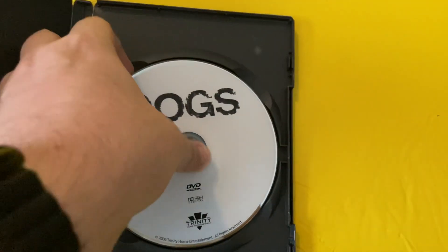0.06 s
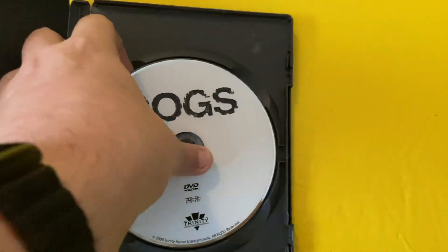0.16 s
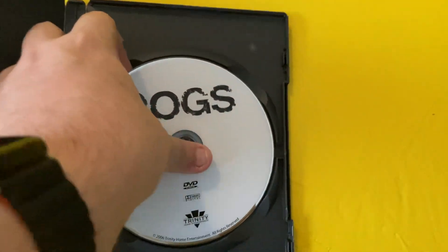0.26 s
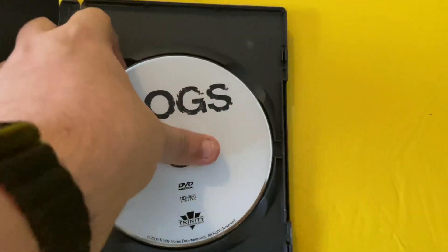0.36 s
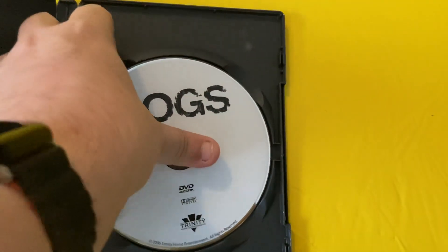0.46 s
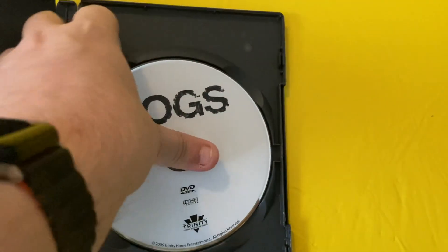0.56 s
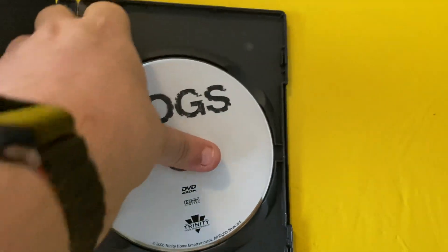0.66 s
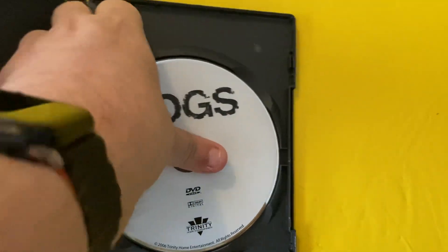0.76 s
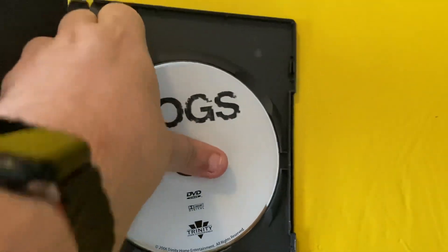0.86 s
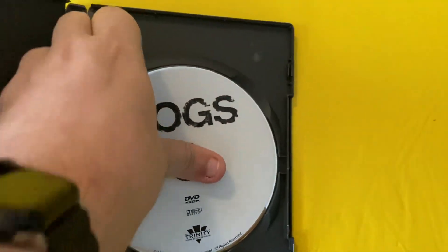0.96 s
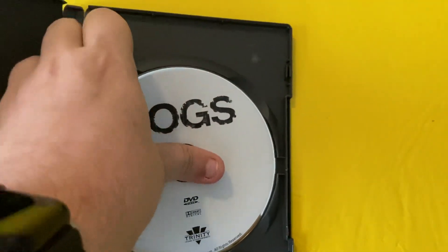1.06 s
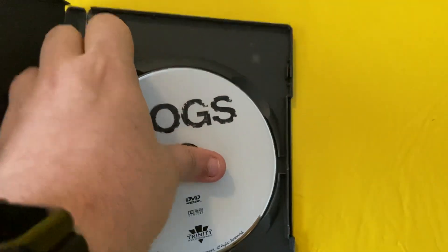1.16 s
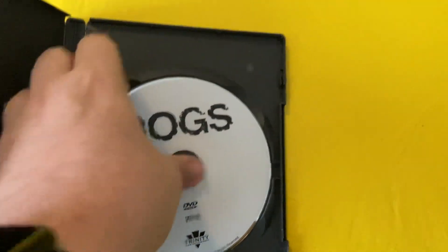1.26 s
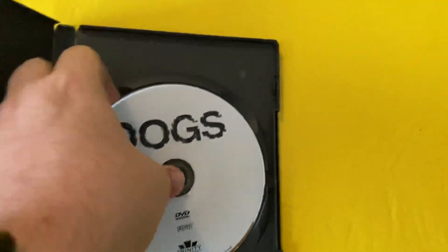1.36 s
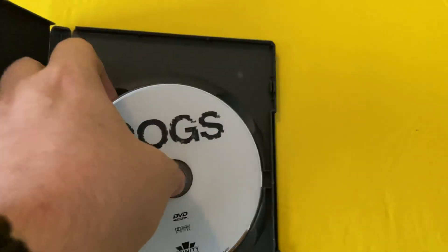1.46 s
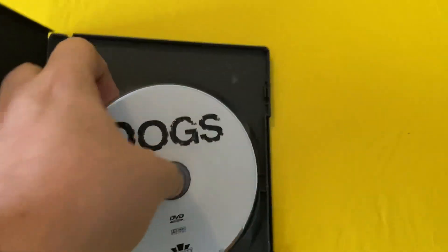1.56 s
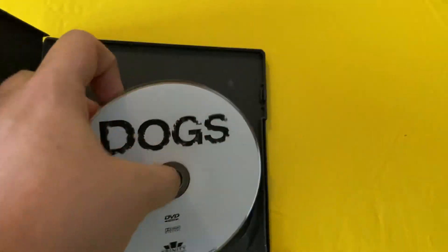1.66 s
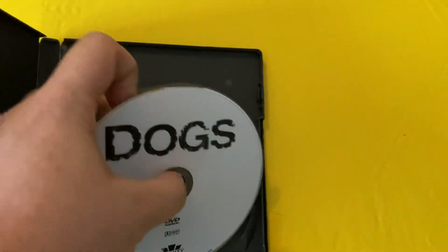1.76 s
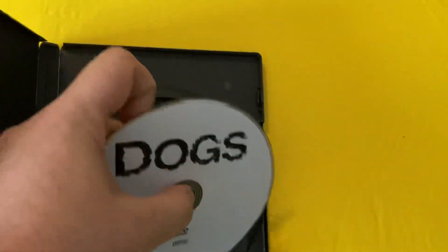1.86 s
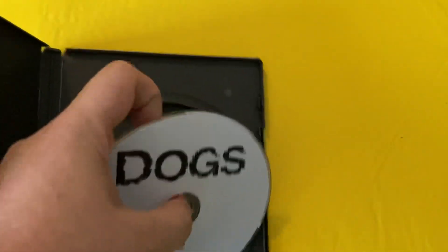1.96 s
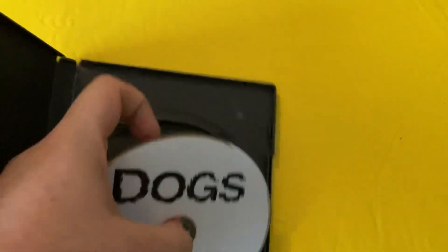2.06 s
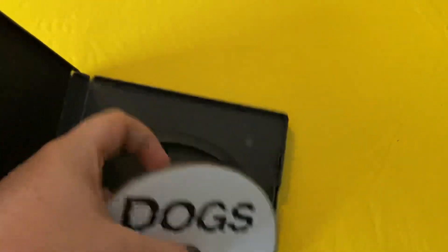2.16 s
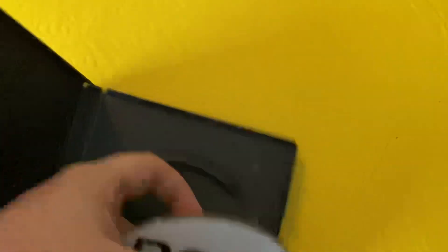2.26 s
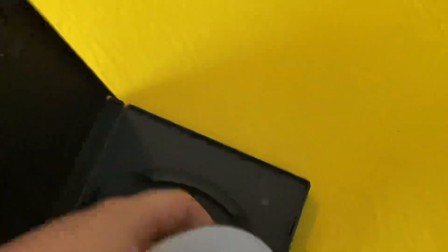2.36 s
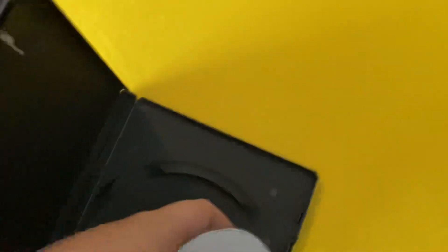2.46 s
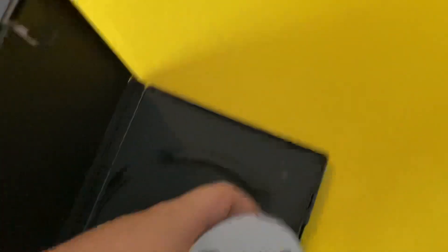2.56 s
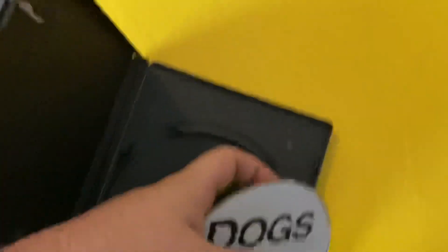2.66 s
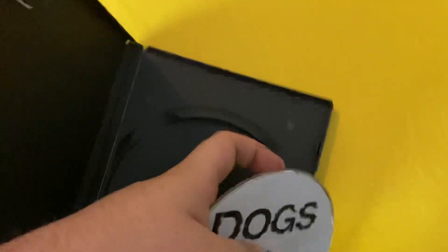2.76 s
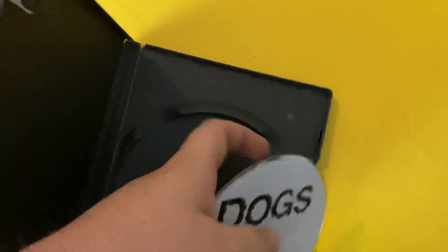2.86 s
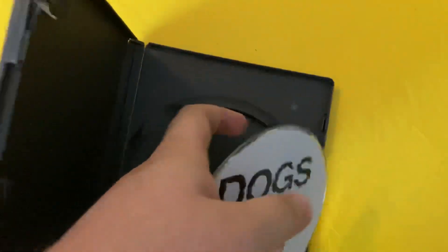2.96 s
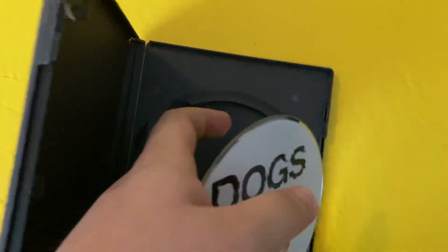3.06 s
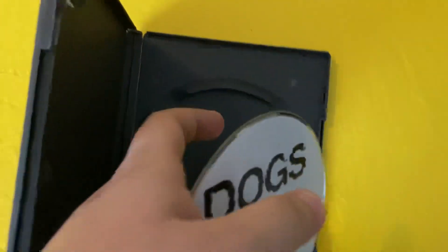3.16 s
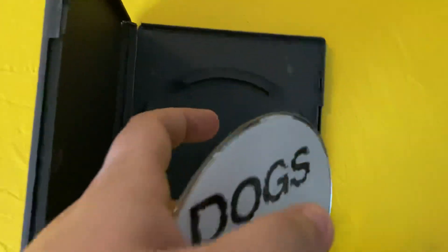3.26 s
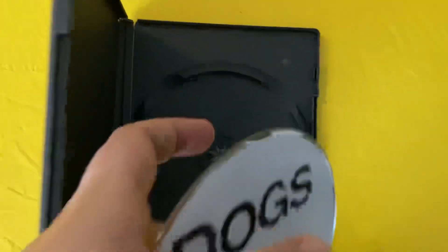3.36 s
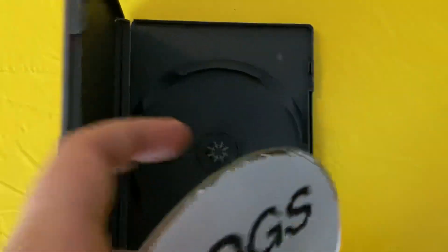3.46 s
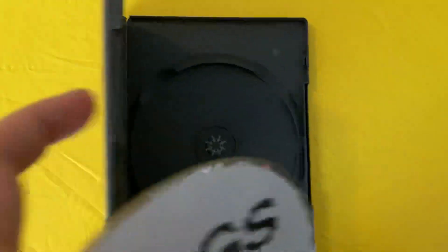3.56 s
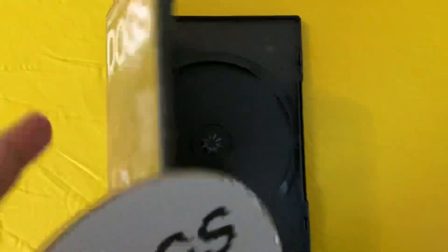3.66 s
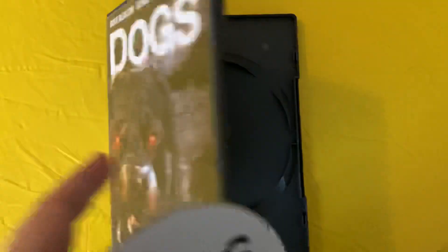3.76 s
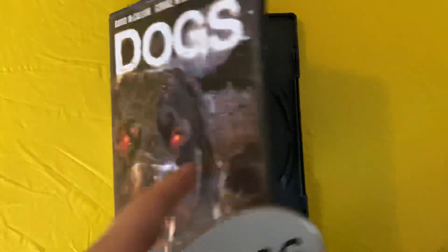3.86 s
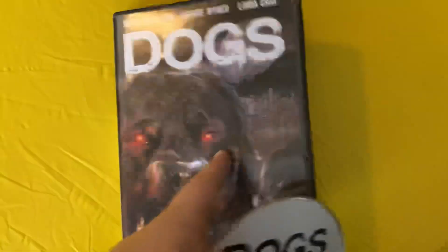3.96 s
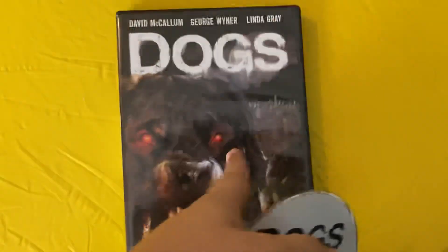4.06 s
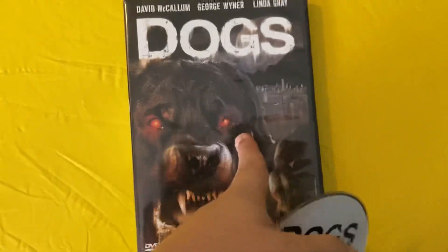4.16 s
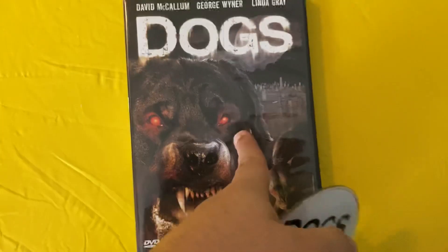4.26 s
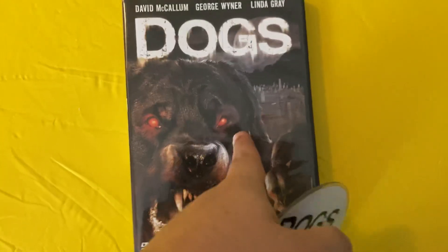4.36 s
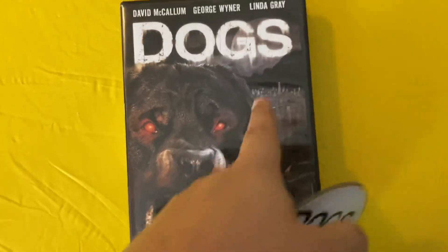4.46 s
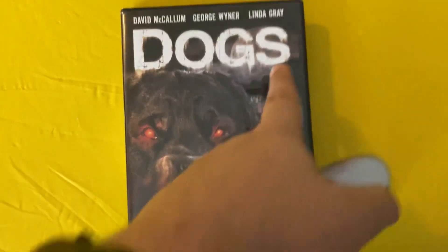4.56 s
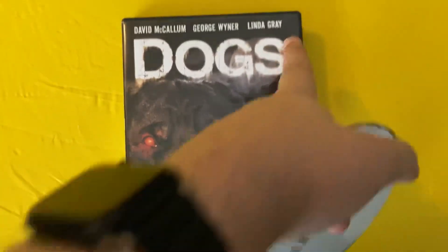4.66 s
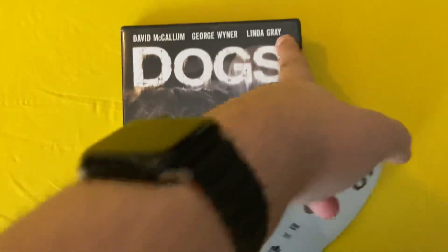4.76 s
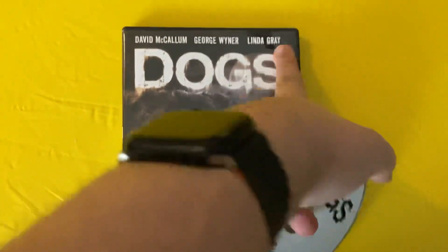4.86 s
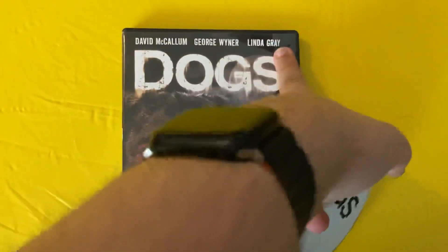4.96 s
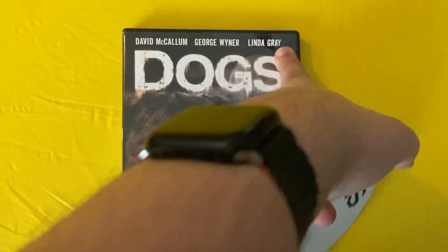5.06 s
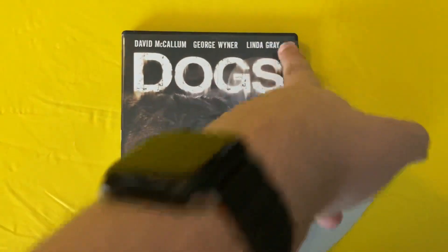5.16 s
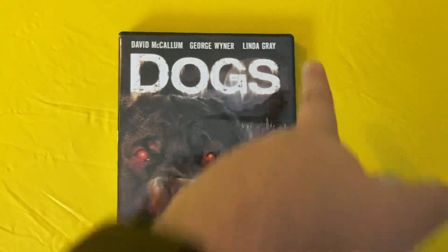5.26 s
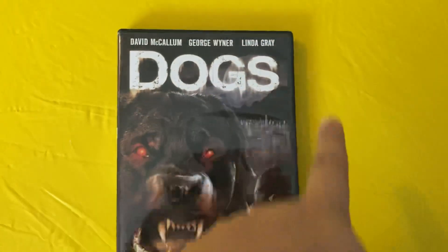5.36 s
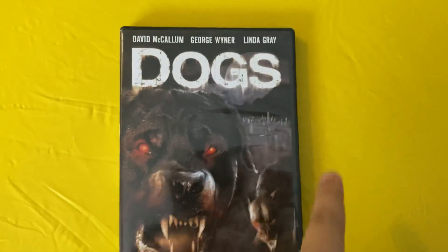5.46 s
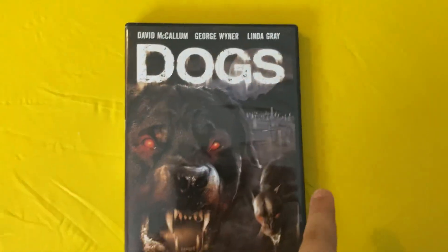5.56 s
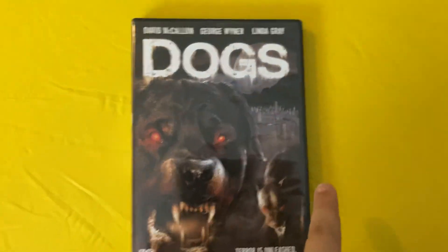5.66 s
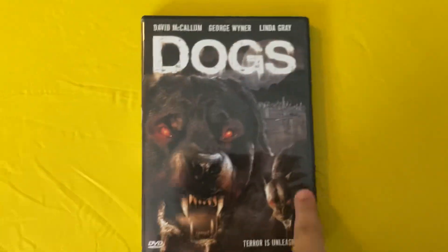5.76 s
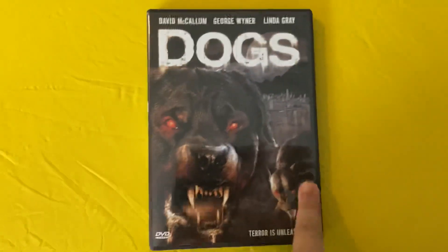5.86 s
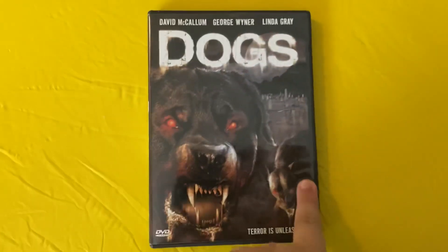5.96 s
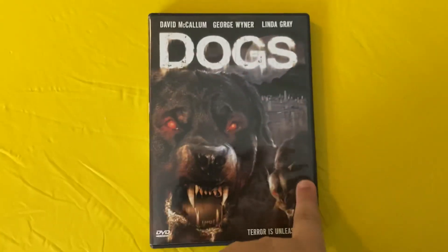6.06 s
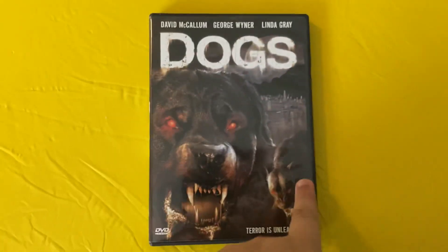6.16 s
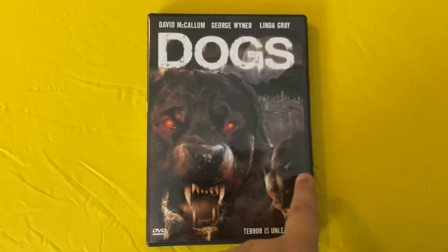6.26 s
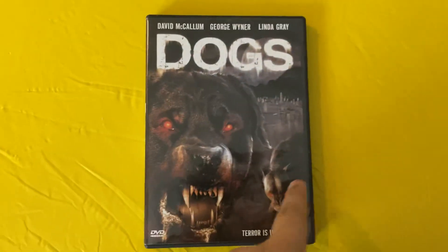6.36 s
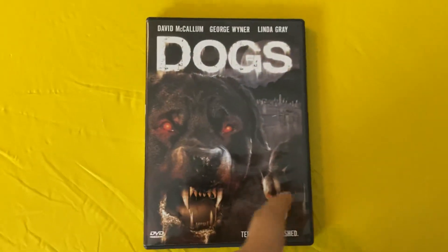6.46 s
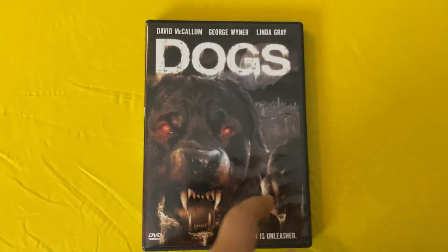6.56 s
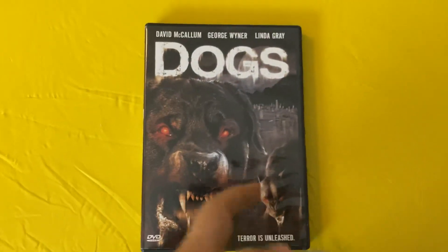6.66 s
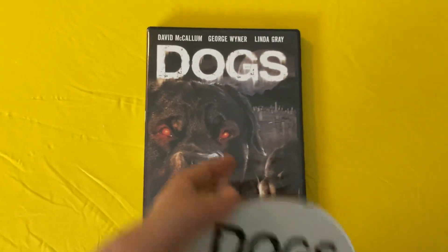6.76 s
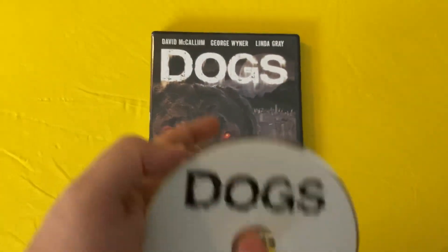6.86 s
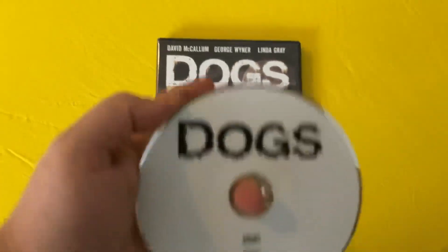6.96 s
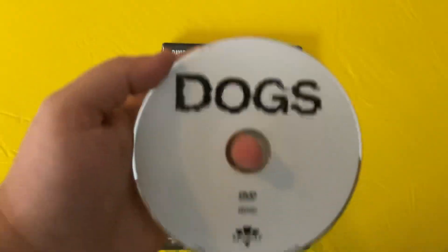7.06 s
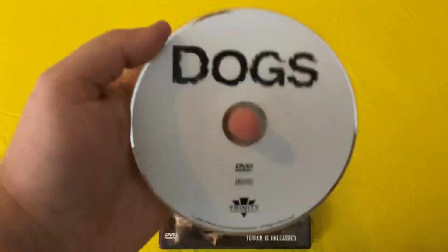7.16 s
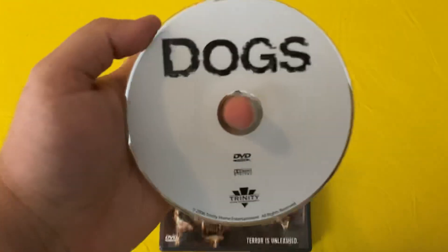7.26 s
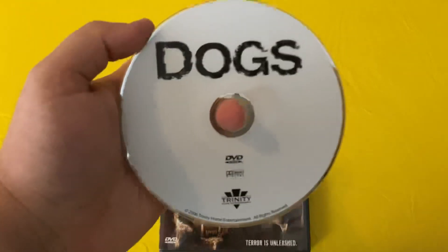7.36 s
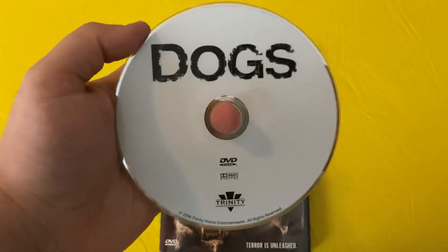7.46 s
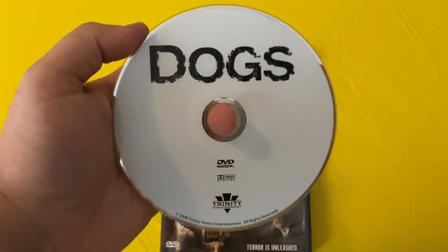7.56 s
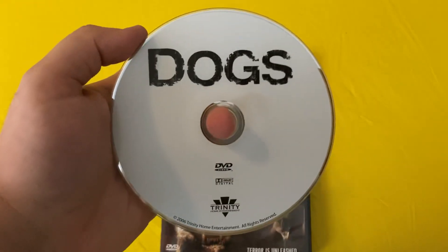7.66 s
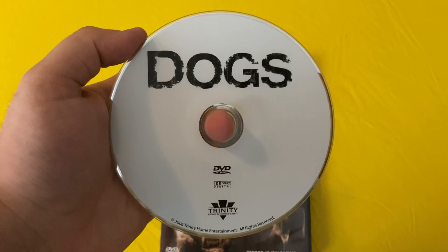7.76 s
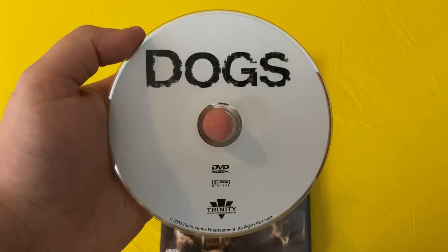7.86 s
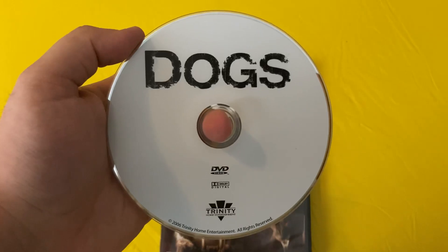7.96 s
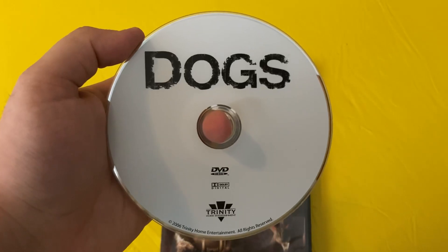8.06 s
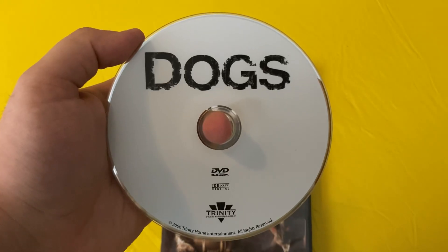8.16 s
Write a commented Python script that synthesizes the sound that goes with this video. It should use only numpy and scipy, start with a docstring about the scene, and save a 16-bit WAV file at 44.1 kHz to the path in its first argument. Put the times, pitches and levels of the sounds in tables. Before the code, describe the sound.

A close stereo perspective in a small indoor room with a quiet low rumble and barely audible drone. Very faint ticks and finger rubbing open the scene. At 0.8 s a loud, hollow plastic snap releases the disc from its hub, and at 1.2 s an equally sharp, brighter clack follows. Small pings and dry scuffs come around 1.4 to 1.8 s, then light flicks as the disc's edge slips past the rim from 1.9 to 2.6 s. Grainy sliding with a thin, bright scrape comes near 2.8 s, then softer friction. At 4.06 s the lid drops with a moderate clack and quick bounce, trailing a short slide. A tiny tick at 4.4 s precedes a strong double latch snap at 4.85 s, a light tick at 5.1 s, and a second hard, lower-bodied latch snap at 5.8 s with a soft thud. Dull grip rustles, faint brushes and tiny taps continue to about 8 s.

```python
"""Disc pulled from its case

Close to a phone in a small room, a disc scuffs, snaps off its plastic hub and flicks past the rim.
The case slides, the lid drops, two latches snap shut and the hand handles what is left.
Knocks are decaying modes with a burst of crackle and a room answer; scuffs, slides and brushes
are shaped noise; thuds are low resonant noise. A low room rumble with a faint drone lies below."""
import sys
import numpy as np
from scipy import signal
from scipy.fft import rfft, irfft, next_fast_len
from scipy.io import wavfile
from scipy.ndimage import uniform_filter1d, map_coordinates

SR = 44100
rng = np.random.default_rng(int(sys.argv[2]) if len(sys.argv) > 2 else 0)


def unload_wav(signal):
    """Save mono or channel-first audio to the path in sys.argv[1] as 16-bit WAV at rate SR, clipped to [-1, 1]."""
    wavfile.write(
        sys.argv[1],
        SR,
        np.round(np.clip(np.atleast_2d(signal).T, -1, 1) * 32767).astype(np.int16),
    )


N = 362061

# Levels in the tables set the balance of the sounds; they are relative.
# Contacts, each: start_s, level_db (over 10 ms), hardness_db, right_port_lag_ms
# Disc and fingers knock on the tray
TRAY_CLICKS = [(0.0485, -49.5, 11, 0.21), (0.057, -56, 11.5, 0.0021), (0.114, -57.5, -23, -0.085),
               (0.127, -56.5, -28, 0), (0.148, -56, -17, 0.17), (1.113, -38.5, -68, 0.24),
               (1.17, -47, -6, 0.18), (1.2007, -15, 13, -0.22), (1.207, -30, -24, 0.3),
               (1.863, -40, -21, 0.17), (2.502, -61, -60, 0.0092), (2.619, -45, -18, 0.16),
               (3.894, -63.5, 12, -0.22)]
# The hub's teeth let go
HUB_SNAP = [(0.7747, -12, -1, 0.12)]
# The loosened disc pings against the hub
DISC_PINGS = [(1.553, -48.5, 3, 0.21), (1.613, -58, -2, 0.2), (1.621, -55, -11, 0.19)]
# The disc's hard edge flicks off the retaining rim
RIM_FLICKS = [(1.919, -31, -14, 0.083), (2.04, -37.5, 3, 0.15), (2.16, -48, 4, 0.1),
              (2.178, -47.5, -25, 0.11), (2.2895, -45.5, -15, 0.0027), (2.403, -56.5, 35, 0.022),
              (2.6135, -43, -1, 0.12)]
# The lid falls on the tray and bounces once
LID_FALL = [(4.0603, -29.5, -6, 0.17), (4.0638, -31, -4.5, 0.0058)]
# A fingertip unsticks from the cover film
FILM_TICKS = [(4.391, -43, 0.5, 0.036), (5.1362, -32, -4, -0.15), (6.1848, -35, 25, -0.198)]
# A finger presses the lid until the upper latch catches, and later taps it
LID_CLICKS = [(4.5, -53, -0.5, 0.15), (4.7635, -52.5, -10, 0.012), (4.7675, -46, -9, 0.08),
              (4.809, -28, -26.5, 0.031), (4.815, -28.5, -9, 0.08), (4.833, -19, -10.5, 0.033),
              (4.8742, -11.5, -5, 0.06), (4.8768, -25.5, 12, 0.071), (6.0935, -43.5, -22, 0.073),
              (6.7575, -52.5, -18, 0.18)]
# The lower latch catches, then fingertips tap the disc they hold
EDGE_CLICKS = [(5.7715, -54, -12, 0.059), (5.7768, -33.5, -17, -0.067), (5.82, -10, -9.5, 0.043),
               (5.8213, -21.5, 5.5, 0.04), (7.109, -55.5, -26.5, -0.072), (7.157, -59, -34.5, 0.044)]

# Modes that each part rings with, each: pitch_hz, level_db, t60_s
TRAY_MODES = [(257.8, -24, 0.02895), (427.4, -13.5, 0.029), (750, -13.5, 0.038), (976, -8.5, 0.0057),
              (1144, -4.5, 0.02), (1315, 0, 0.036), (1690, 5.5, 0.011), (2047, 3, 0.0096),
              (2550, -6.5, 0.013), (3000, -3, 0.0048), (4270, -2, 0.026), (4860, -5.5, 0.013),
              (6382, -9.5, 0.0097), (6770, -5, 0.009), (8244, -10, 0.0037), (11200, 8.5, 0.0017),
              (12530, 2.5, 0.0039)]
HUB_MODES = [(413, -13.5, 0.055), (544.3, -4, 0.035), (807, -16, 0.024), (1400, 8, 0.015),
             (1650, -7, 0.016), (2020, -11.5, 0.026), (2730, -6, 0.011), (3300, -8.5, 0.0049),
             (4048, -8, 0.013), (4650, -2.5, 0.015), (6227, -9.5, 0.0029), (8250, -10.5, 0.013),
             (10385, -12, 0.013), (12000, -12.5, 0.008)]
DISC_MODES = [(900, -18, 0.0201), (1800, -7, 0.012), (3010, 1, 0.022), (3300, 2, 0.033), (3430, -3, 0.02),
              (4680, -12, 0.012)]
# The cover film and the lid under it: pitch_hz, level_db, t60_s
FILM_MODES = [(558, -6, 0.025), (774, -1, 0.014), (1080, -23, 0.0032), (1900, -40, 0.0023),
              (2870, -20, 0.0071), (7480, -0.5, 0.005), (10460, 3, 0.0055), (11520, 7.5, 0.0018)]
LID_MODES = [(222, -4, 0.015), (308.7, -8, 0.021), (446, -8, 0.033), (720, 0, .018), (1101, 3, 0.0089),
             (1373, -1, 0.011), (1680, -15, 0.023), (2095, -6.5, 0.016), (2495, -14.5, 0.02),
             (2830, -8, 0.008), (3860, -13, 0.0054), (4630, -15.5, 0.0059), (7000, 0.5, 0.0042),
             (8500, -9, 0.003), (11300, -4.5, 0.0017)]
EDGE_MODES = [(222, -6.5, 0.027), (296, -13, 0.034), (420, -2.5, 0.027), (567, -0.5, 0.03),
              (740, -21.5, 0.024), (1000, -18, 0.0041), (1355, -14.5, 0.032), (1603, -17, 0.011),
              (1970, -13, 0.016), (2400, -10, 0.009), (2900, -6, 0.01), (3600, -20, 0.0044),
              (5370, -4.5, 0.0075), (7034, -9.5, 0.006), (11500, -7, 0.0025)]

# Resonances that sing on in the room answer to a blow, each: pitch_hz, width_hz, level_db
TRAY_LINGER = [(1100, 90, -0.5), (1661.5, 120, 6), (2450, 140, 3), (3213, 160, 1.5), (4740, 220, 1)]
HUB_LINGER = [(387.2, 45, 6), (539.6, 43, 2), (1450, 110, -4), (1680, 240, 9), (3257, 260, 3),
              (4720, 400, -4), (7100, 300, 0.5)]
DISC_LINGER = [(3400, 250, 0.85)]
LID_LINGER = [(416, 35, 1), (680, 54, 4.5), (1254, 45, -1), (2050, 90, -4), (3100, 83, -2.5),
              (4200, 290, -1.5)]
EDGE_LINGER = [(590.6, 80, -0.5), (1020, 57, 1.5), (1415, 74, 0), (2000, 160, 2.5), (3150, 120, 2.5),
               (3940, 60, 5)]

# Lower edges of the four ranges of a blow, knock, clack, snap and tick: edge_hz
RANGE_EDGES_HZ = [130, 900, 2400, 6500]
# How much of the hardness each range gains, knock to tick: share (no unit)
HARDNESS_SHARE = [0, 0.4, 1, 1.2]
# Slipping plastic: pitch_hz, level_db
CRACK_COLOUR = [(150, -17.5), (400, -3), (900, 4.5), (12000, -5), (16000, -7.5)]

# Bell-shaped strokes, each: centre_s, half_length_s, level_db, pitch_hz
# Disc, fingertips and case scuff and tap
SCUFFS = [(0.122, 0.042, -62, 1260), (0.536, 0.008, -60, 651), (1.386, 0.011, -41, 2020),
          (1.394, 0.0095, -43.5, 1120), (1.661, 0.013, -51, 1400), (1.765, 0.037, -68, 1190),
          (1.823, 0.01, -59.5, 1466), (1.849, 0.012, -39, 1290), (1.903, 0.013, -36, 1400),
          (2.056, 0.0069, -52, 1460), (2.167, 0.012, -40, 1670), (2.225, 0.0093, -46.5, 1420),
          (2.299, 0.005, -48, 1290), (2.404, 0.005, -46, 900), (2.617, 0.004, -41.5, 1300),
          (2.599, 0.0091, -59.5, 1350), (3.107, 0.021, -60.5, 617), (3.317, 0.035, -64, 2000),
          (3.39, 0.025, -73, 1100), (7.258, 0.0018, -61, 900), (7.28, .002, -63.5, 1000),
          (7.319, 0.0018, -63, 800), (7.328, 0.0013, -62.5, 950), (7.362, 0.002, -64, 560)]
# The case flexes against the table
THUDS = [(0.772, 0.0069, -46, 151), (1.148, 0.033, -44, 108), (1.14, 0.023, -45.5, 376),
         (1.858, 0.013, -37.5, 66), (2.541, 0.058, -58.5, 66), (2.926, 0.024, -55.5, 87),
         (4.88, 0.01, -37, 89.2), (5.888, 0.031, -36.5, 45.8)]
# Soft brushes and scrapes of hand and case
BRUSHES = [(3.32, 0.036, -61, 3000), (3.404, 0.014, -59.5, 4770), (6.195, 0.024, -67.5, 7000),
           (5.601, 0.068, -69, 3780), (6.623, 0.018, -72, 1400), (1.66, 0.011, -61, 4530),
           (2.308, 0.033, -63.5, 12000), (2.846, 0.11, -54, 8500), (2.862, 0.004, -48.5, 5540),
           (2.885, 0.0032, -44, 5560), (2.907, 0.04, -53, 7650), (3.778, 0.033, -67, 5200),
           (5.532, 0.038, -58.5, 1900), (5.613, 0.065, -65, 2450), (6.45, 0.03, -81, 2200),
           (6.619, 0.029, -79.5, 4530), (6.693, 0.033, -77, 2300), (6.904, 0.03, -72.5, 2800),
           (7.004, 0.027, -68, 3000), (7.074, 0.012, -64.5, 1570), (7.291, 0.039, -76, 1502),
           (7.696, 0.034, -69, 1190)]

# Skin, disc and case slide on each other and on the table: start_s, length_s, level_db, change_db
SLIDES = [(0.07, 0.15, -73.5, -9), (0.22, 0.55, -65, -2.5), (0.55, 0.37, -61, 1.5), (0.95, 0.36, -63, 8),
          (1.6, 0.064, -69.5, 0), (1.84, 0.34, -68, 13.5), (2.22, 0.19, -59.5, -6.5),
          (2.62, 0.13, -60, -11.5), (2.715, 0.17, -53.5, 2), (2.9, 0.313, -64.5, 3),
          (3.22, 0.21, -64.5, -0.5), (3.43, 0.12, -74, 1), (3.74, 0.19, -58.5, -17.5),
          (4.085, 0.24, -50.5, -23.5), (5.0, 0.2, -54, -15.5)]
# The hand shifts its grip: start_s, length_s, level_db, change_db
HAND_MOVES = [(5.46, 0.45, -48, -11), (5.95, 0.31, -62, 7), (6.37, 0.11, -62, -2.5), (7.2, 0.091, -62.5, 9),
              (7.37, 0.25, -62, -8.5), (7.66, 0.092, -54, -3), (7.83, 0.34, -61.5, 0)]
# Spectrum of the sliding: pitch_hz, level_db (per Hz)
SLIDE_COLOUR = [(150, -20.5), (350, 1.5), (700, 2.5), (1500, -2), (2200, -0.5), (3400, -1), (5500, -7),
                (8000, -8), (11500, -12.5), (13500, -19), (16000, -17.5)]
# Spectrum of the hand's rustle: pitch_hz, level_db (per Hz)
RUSTLE_COLOUR = [(60, -12.5), (120, 4), (220, 4.5), (350, -8.5), (480, -8), (700, -19.5), (1400, -36.5),
                 (3000, -47), (12000, -60.5)]
# Spectrum of the room's rumble: pitch_hz, level_db (per Hz)
AMBIENCE_COLOUR = [(12, -56.5), (20, -28), (48, -2), (110, -2), (190, -10), (290, -16.5), (450, -18.5),
                   (700, -23), (950, -36), (1400, -36), (2500, -41), (8000, -48.5), (16000, -49.5)]

# Left-right likeness of diffuse sound: pitch_hz, likeness (-1 to 1)
ALIKE = [(30, -0.66), (60, 1), (110, 0.058), (200, -0.25), (380, 0.8), (700, 0.49), (1300, 0.14),
         (2400, -0.54), (4400, 0.074), (8000, -0.22), (15000, 0.5)]
# Decay of the walls' answer: pitch_hz, t60_s
ROOM_T60 = [(150, .55), (400, 0.45), (1000, 0.49), (2800, .5), (7000, 0.45), (11000, 0.48), (15000, 0.38)]
# Colour of the walls' answer: pitch_hz, level_db
ROOM_COLOUR = [(100, 5), (300, -3), (550, -2), (1100, -3.5), (2100, 2), (3200, 3.5), (7000, -3.5),
               (11000, -7.5), (16000, -10)]
# Treble colour of the whole scene: pitch_hz, level_db
TREBLE_COLOUR = [(5000, 0), (8000, 2), (9100, -5), (10300, 3.5), (12200, 3), (13700, -4.5), (15500, -0.5)]

TOP_HZ = 16500  # top of the audible band
HAND_LAG_MS = 0.17  # the working hand is on the left, so the right port hears it later


def amp(db):
    """Decibels to gain."""
    return 10 ** (np.asarray(db) / 20)


def unit(x):
    """Bring a signal to rms 1."""
    return x / np.sqrt(np.mean(x ** 2) + 1e-20)


def along(points, hz):
    """Read a curve of (Hz, value) points on a log frequency axis."""
    f, v = np.transpose(points)
    return np.interp(np.log(hz + 1), np.log(f + 1), v)


def wobble(rate):
    """A smooth random curve with rate knots a second."""
    knots = rng.standard_normal(int(N * rate / SR) + 4)
    return map_coordinates(knots, [np.arange(N) * rate / SR])


def filtered(x, response):
    """Filter a signal by a complex response of frequency."""
    n = x.shape[-1]
    m = next_fast_len(n + 4096)
    return irfft(rfft(x, m) * response(np.fft.rfftfreq(m, 1 / SR)), m)[..., :n]


def resonance(hz, centre, width):
    """Causal response of one damped resonance."""
    return 1j * hz * width / (centre ** 2 - hz ** 2 + 1j * hz * width)


def ports(hz, lag_ms):
    """Response of the two microphone ports; a positive lag reaches the right one later."""
    return np.exp(1j * np.pi * hz * lag_ms / 1000 * np.array([[1], [-1]]))


def add(track, s, sound):
    """Mix a stereo sound in at time s."""
    start = max(round(s * SR), 0)
    part = track[:, start:start + sound.shape[1]]
    part += sound[:, :part.shape[1]]


def diffuse(pair, colour):
    """Blend two signals into one coloured stereo sound whose ports are as alike as ALIKE says."""
    def spread(hz):
        turn = np.arccos(np.clip(along(ALIKE, hz), -1, 1)) / 2
        return amp(along(colour, hz)) * [np.cos(turn), np.sin(turn)]
    mid, side = filtered(pair, spread)
    return unit(np.array([mid + side, mid - side]))


def smooth(field, across_hz, across_time):
    """Average a time-frequency field over a few bins and frames."""
    return uniform_filter1d(uniform_filter1d(field, size=across_hz, axis=0), size=across_time, axis=1)


def patchy(depth_db, ridge_db):
    """Two noises whose shared colour drifts, with narrow ridges that come and go as contact wanders."""
    z = signal.stft(rng.standard_normal((2, N)), nperseg=512)[2]
    patches = unit(smooth(rng.standard_normal(z.shape[1:]), 9, 12))
    ridges = unit(smooth(rng.standard_normal(z.shape[1:]), 3, 18))
    shaped = z * amp(depth_db * patches + ridge_db * ridges)
    return unit(signal.istft(shaped, nperseg=512)[1][:, :N])


def swell(half):
    """A bell-shaped stroke, three half lengths to either side."""
    return np.exp(-np.linspace(-3, 3, int(6 * half * SR)) ** 2 / 2)


def strokes(rows, attack_s, release_t60):
    """Gain of hand movements: a quick start, an even rise or fall in dB, then a decay."""
    gain = np.zeros(N)
    for start, length, db, change_db in rows:
        t = np.maximum(np.arange(N) / SR - start, 0)
        hold_db = db + change_db * np.minimum(t / length, 1)
        release_db = -60 * np.maximum(t - length, 0) / release_t60
        gain = np.hypot(gain, np.minimum(t / attack_s, 1) * amp(hold_db + release_db))
    return gain


def walls(early_db, early_t60):
    """A fresh room answer: quick reflections from table and hands, and the walls' grainy tail."""
    hz, t, z = signal.stft(rng.standard_normal((2, SR * 3 // 5)), SR, nperseg=256)
    late = amp(-60 * t / along(ROOM_T60, hz)[:, None])
    fade = late + amp(early_db - 60 * t / early_t60)
    grain = amp(3.5 * unit(uniform_filter1d(rng.standard_normal(fade.shape), size=10, axis=0)))
    tail = diffuse(signal.istft(z * fade * grain, SR, nperseg=256)[1], ROOM_COLOUR)
    return tail / np.linalg.norm(tail[0])


def strike(modes, crack_db, crack_t60, spike_db, build_cycles, apart_hz):
    """A close blow: a spike, a crack of slipping plastic, and modes that swell in and die away."""
    t = np.arange(SR // 12) / SR
    hz, db, t60 = np.transpose(modes)[:, :, None]
    # Neighbouring modes start in roughly opposite directions.
    phase = np.pi * np.arange(len(hz))[:, None] + 0.35 * rng.standard_normal(hz.shape)
    # The higher a mode, the more its phase differs between the two ports, up to a limit.
    phase = phase + np.minimum(hz / apart_hz, 1.5) * rng.standard_normal((2, *hz.shape))
    decay = amp(db + rng.normal(0, 0.23, hz.shape) - 60 * t / t60)
    build = 1 - np.exp(-t * hz / build_cycles)
    ring = (decay * build * np.sin(2 * np.pi * hz * t + phase)).sum(1)
    burst = rng.standard_normal((2, len(t))) * amp(-60 * t / crack_t60) * (1 - np.exp(-t / 0.0012))
    crack = amp(crack_db) * diffuse(burst, CRACK_COLOUR)
    spike = amp(spike_db) * unit(t == 0)
    return unit(ring) + crack + spike


def radiated(modes, linger, floor_db):
    """A blow as sent into the room: modes add in power over a broad floor; some resonances sing on."""
    hz = np.fft.rfftfreq(SR // 12, 1 / SR)
    power = 0
    for centre, db, t60 in modes:
        width = np.log(1000) / np.pi / t60
        power = power + np.abs(amp(db) * t60 * resonance(hz, centre, width)) ** 2
    floor = amp(floor_db) * unit(amp(along(CRACK_COLOUR, hz)))
    gain = np.hypot(unit(np.sqrt(power)), floor)
    blow = np.roll(irfft(gain), SR // 500)[:SR // 20]  # centred at 2 ms, cut at 50 ms
    return filtered(blow, lambda f: 1 + sum(amp(db) * resonance(f, centre, width)
                                            for centre, width, db in linger))


def balanced(blow, ranges_db):
    """Balance knock, clack, snap and tick in a blow, and bring it to about 0 dB over 10 ms."""
    edges = RANGE_EDGES_HZ + [TOP_HZ]
    gains = amp(ranges_db) / np.linalg.norm(amp(ranges_db))
    mix = 0
    for gain, pair in zip(gains, zip(edges, edges[1:])):
        band = signal.butter(3, pair, "band", fs=SR, output="sos")
        mix = mix + gain * unit(signal.sosfilt(band, blow))
    return mix * np.sqrt(.01 * SR / blow.shape[-1])


def contacts(rows, modes, linger, near_db, far_db, floor_db, bend_ms, wet_db, early_db, early_t60,
             **touch):
    """Contacts ring a part; hardness tilts them, near_db balances the phone, far_db the walls."""
    track, outward = np.zeros((2, N)), radiated(modes, linger, floor_db)

    # Low bending waves cross thin plastic more slowly (bend_ms at 1 kHz): a downward chirp.
    def bend(hz):
        return np.exp(-4j * np.pi * bend_ms * np.sqrt(hz / 1000))

    for s, db, hardness_db, lag_ms in rows:
        tilt_db = hardness_db * np.array(HARDNESS_SHARE)
        click = balanced(strike(modes, **touch), near_db + tilt_db)
        add(track, s, amp(db) * filtered(click, lambda hz: bend(hz) * ports(hz, lag_ms)))
        far_blow = balanced(outward, far_db + tilt_db)
        answer = signal.fftconvolve(far_blow[None], walls(early_db, early_t60), axes=1)
        add(track, s, amp(db + wet_db) * answer)
    return track


def ambience():
    """The room's low rumble is coloured noise, with a faint drone of narrow noise at 171 Hz."""
    rumble = diffuse(rng.standard_normal((2, N)), AMBIENCE_COLOUR)
    drone = unit(filtered(rng.standard_normal(N), lambda hz: resonance(hz, 171.0, 34) ** 2))
    return amp(-58.5) * rumble + amp(-66.5) * drone


def tray_clicks():
    """Knocks from disc and fingers excite the tray's short, clacking modes."""
    return contacts(TRAY_CLICKS, TRAY_MODES, TRAY_LINGER,
                    near_db=[1, 9, 1.0, -2.5], far_db=[12.5, 7.5, -0.5, -4.5],
                    floor_db=-5.5, bend_ms=0.44, wet_db=-14.5, early_db=6.0, early_t60=0.12,
                    crack_db=-5.0, crack_t60=0.0091, spike_db=-12.0, build_cycles=5.7, apart_hz=3000)


def sliding():
    """Friction is a grainy, shifting hiss that ticks finely where the surfaces catch."""
    catches_per_s, catch_db, wet_db = 70, 15, -1.5
    grains = patchy(depth_db=2.5, ridge_db=4.5) * amp(2 * wobble(320))
    catches = (rng.random(N) < catches_per_s / SR) * rng.laplace(size=N)
    direct = unit(filtered(grains[0] + amp(catch_db) * catches,
                           lambda hz: amp(along(SLIDE_COLOUR, hz)) * ports(hz, HAND_LAG_MS)))
    reflected = diffuse(patchy(depth_db=2.0, ridge_db=4.0), SLIDE_COLOUR)
    level = strokes(SLIDES, attack_s=0.0147, release_t60=0.196) * amp(2.0 + wobble(44))
    return level * unit(direct + amp(wet_db) * reflected)


def scuffs():
    """Irregular tiny slips excite one pitched resonance and a broad body answer, in the room."""
    slips_per_s, width_hz, broad_db, grit_db, wet_db = 2600, 420, -7.0, -30.5, -12.0
    track = np.zeros((2, N))

    def broad(hz):
        return amp(broad_db) * resonance(hz, 930, 550) ** 2 + amp(grit_db) * resonance(hz, 3000, 2000)

    for s, half, db, pitch in SCUFFS:
        def body(hz):
            pitched = resonance(hz, pitch, width_hz) * resonance(hz, pitch, 1000)
            return (pitched + broad(hz)) * ports(hz, HAND_LAG_MS)
        stroke = swell(half)
        slips = (rng.random(len(stroke)) < slips_per_s / SR) * rng.uniform(-2.6, 1, len(stroke))
        pair = unit(slips) + .45 * rng.standard_normal((2, len(stroke)))
        add(track, s - len(stroke) / SR / 2, amp(db) * stroke * unit(filtered(pair, body)))
    answer = signal.fftconvolve(track, walls(early_db=2.5, early_t60=0.089), axes=1)[:, :N]
    return track + amp(wet_db) * answer


def thuds():
    """Soft pushes rock the case on the table in a few low cycles."""
    width_share, side_db = 0.51, -7.0
    track = np.zeros((2, N))
    for s, half, db, pitch in THUDS:
        stroke = swell(half)
        noise = rng.standard_normal((2, len(stroke)))
        mid, side = filtered(noise, lambda hz: resonance(hz, pitch, width_share * pitch) ** 2)
        push = unit(stroke * (mid + amp(side_db) * np.array([side, -side])))
        push = push * np.sqrt(np.mean(stroke ** 2))
        add(track, s - len(stroke) / SR / 2, amp(db) * push)
    return track


def hub_snap():
    """The hub's teeth scrape past the disc and spring free, ringing the hub."""
    return contacts(HUB_SNAP, HUB_MODES, HUB_LINGER,
                    near_db=[-1.5, 5.0, 3.0, -4.0], far_db=[2, 7.0, 0, -4.0],
                    floor_db=-8.0, bend_ms=0.045, wet_db=-14.5, early_db=2.5, early_t60=0.056,
                    crack_db=-13.5, crack_t60=0.028, spike_db=-22.5, build_cycles=3.7, apart_hz=2580)


def disc_pings():
    """The loose disc touches the hub and rings most strongly near 3 kHz."""
    return contacts(DISC_PINGS, DISC_MODES, DISC_LINGER,
                    near_db=[-8, 0, 3, -22], far_db=[0, -1, -10, -18],
                    floor_db=8, bend_ms=0.18, wet_db=-3, early_db=-11, early_t60=0.069,
                    crack_db=-14, crack_t60=0.012, spike_db=-22.5, build_cycles=4.4, apart_hz=3980)


def brushes():
    """Brushing and scraping make a dense, broad friction noise around each stroke's pitch."""
    quality, grain_db = 0.73, 2.5
    track = np.zeros((2, N))
    for s, half, db, pitch in BRUSHES:
        stroke = swell(half)
        grain = unit(uniform_filter1d(rng.standard_normal(len(stroke)), 60))
        noise = rng.standard_normal((2, len(stroke))) * amp(grain_db * grain)
        hiss = filtered(noise, lambda hz: resonance(hz, pitch, pitch / quality) ** 2)
        brush = diffuse(hiss, [(300, 21.0), (15000, -10.0)])  # darkens steadily: (Hz, dB)
        add(track, s - len(stroke) / SR / 2, amp(db) * stroke * brush)
    return track


def rim_flicks():
    """The disc's hard edge slips off the retaining rim and flicks the tray's modes."""
    return contacts(RIM_FLICKS, TRAY_MODES, TRAY_LINGER,
                    near_db=[7.4, 17.8, 5, 2], far_db=[10.0, 3.0, -6, 0],
                    floor_db=-9, bend_ms=0.116, wet_db=-9.5, early_db=15.5, early_t60=0.086,
                    crack_db=2, crack_t60=0.0058, spike_db=-3.5, build_cycles=0.86, apart_hz=4020)


def lid_fall():
    """The falling lid hits the tray and bounces once, sounding its own modes."""
    return contacts(LID_FALL, LID_MODES, LID_LINGER,
                    near_db=[5, 8, -7.0, -19], far_db=[-6.0, -2, -4.0, 0.5],
                    floor_db=6, bend_ms=0.86, wet_db=-14.0, early_db=0, early_t60=0.11,
                    crack_db=0.5, crack_t60=0.0084, spike_db=-11, build_cycles=1.0, apart_hz=3500)


def film_ticks():
    """Film letting go of a fingertip ticks with the modes of the film and the lid below."""
    return contacts(FILM_TICKS, FILM_MODES, LID_LINGER,
                    near_db=[4.0, 4.5, -5.0, 8], far_db=[-4, -5.0, -8.0, 1.5],
                    floor_db=1.5, bend_ms=1.0, wet_db=-14.0, early_db=7.5, early_t60=0.19,
                    crack_db=-8.5, crack_t60=0.033, spike_db=-6.0, build_cycles=0.12, apart_hz=5900)


def upper_latch():
    """Finger pressure, the catching upper latch and later taps ring the lid."""
    return contacts(LID_CLICKS, LID_MODES, LID_LINGER,
                    near_db=[0.5, 1.5, -3.5, -5.5], far_db=[-.5, -0.099, 1.0, 1],
                    floor_db=-2.5, bend_ms=0.7, wet_db=-10, early_db=2.0, early_t60=0.11,
                    crack_db=-7.0, crack_t60=0.022, spike_db=-15.5, build_cycles=0.56, apart_hz=3950)


def hand_rustle():
    """A shifting grip makes a dull, uneven noise, mostly in the bass."""
    level = strokes(HAND_MOVES, attack_s=0.012, release_t60=0.36) * amp(2.0 + 2.5 * wobble(12))
    return level * diffuse(rng.standard_normal((2, N)), RUSTLE_COLOUR)


def lower_latch():
    """The lower latch catches and later fingertips tap the held disc, all ringing the edge of the case."""
    return contacts(EDGE_CLICKS, EDGE_MODES, EDGE_LINGER,
                    near_db=[1, -7, -0.5, -0.5], far_db=[-3, -1.5, 0.0, -3.5],
                    floor_db=-0.5, bend_ms=0.88, wet_db=-12, early_db=4.5, early_t60=0.051,
                    crack_db=-11.0, crack_t60=0.0058, spike_db=-11, build_cycles=0.4, apart_hz=4000)


def scene():
    """Add up the case, which lies a little to the left, the friction and the room."""
    opening = tray_clicks() + scuffs() + thuds() + hub_snap() + disc_pings() + rim_flicks()
    closing = lid_fall() + film_ticks() + upper_latch() + hand_rustle() + lower_latch()
    lean_left = amp([[.7], [-.7]])
    friction = sliding() + brushes()
    return (opening + closing) * lean_left + friction + ambience()


def record(dry):
    """Colours the treble, rounds the loudest peaks and cuts steeply above the band."""
    heard = filtered(dry, lambda hz: amp(along(TREBLE_COLOUR, hz)))
    rounded = heard / (1 + np.abs(heard / .9) ** 6) ** (1 / 6)
    return filtered(rounded, lambda hz: 1 / (1 + (hz / TOP_HZ) ** 120))


dry = scene()
out = record(dry)
unload_wav(out)
```